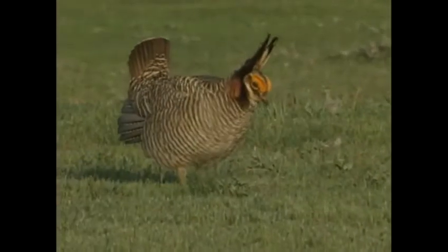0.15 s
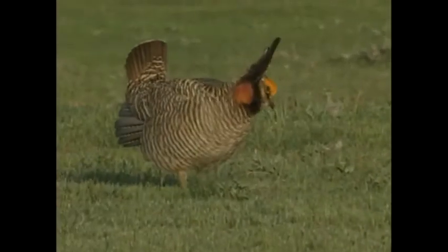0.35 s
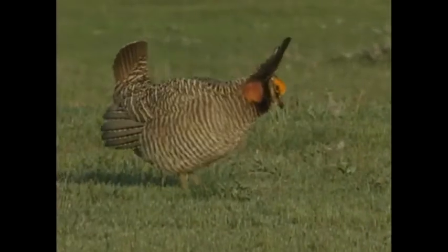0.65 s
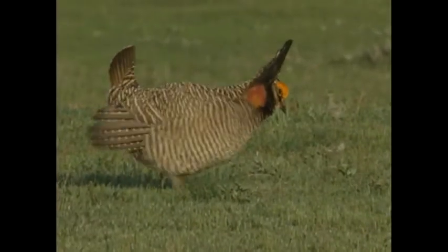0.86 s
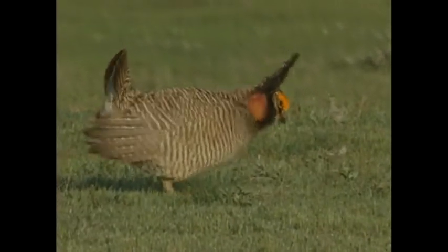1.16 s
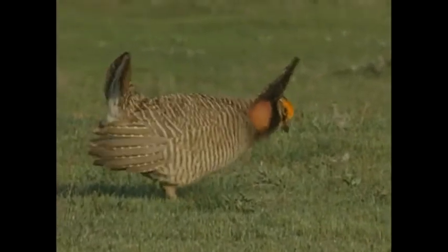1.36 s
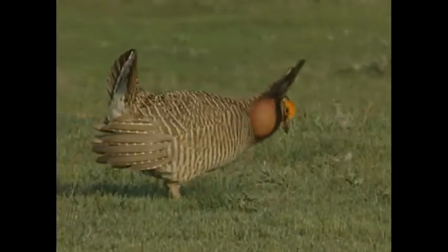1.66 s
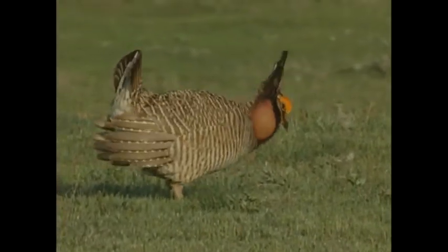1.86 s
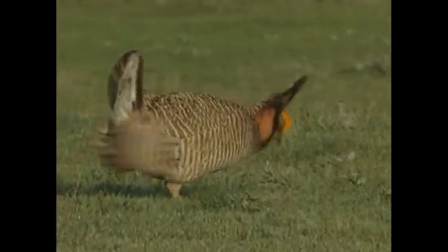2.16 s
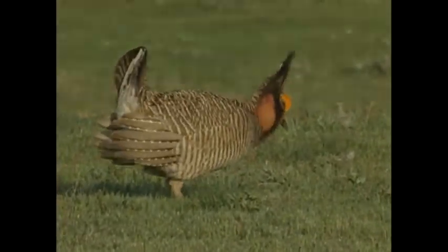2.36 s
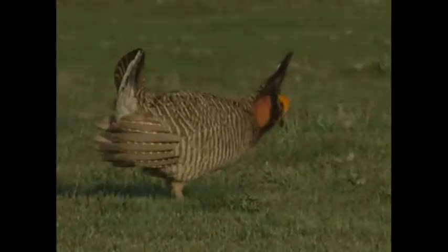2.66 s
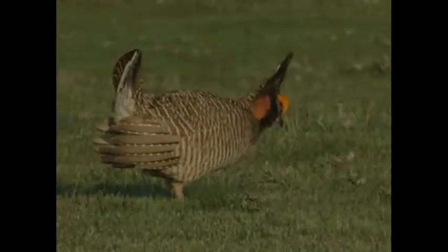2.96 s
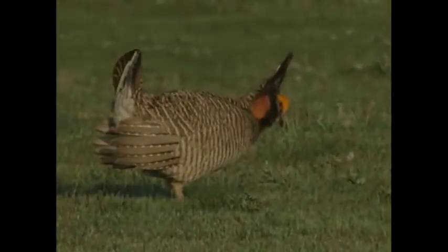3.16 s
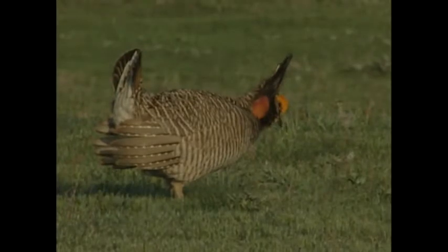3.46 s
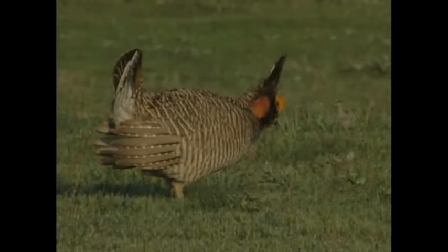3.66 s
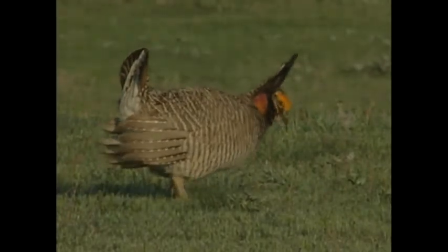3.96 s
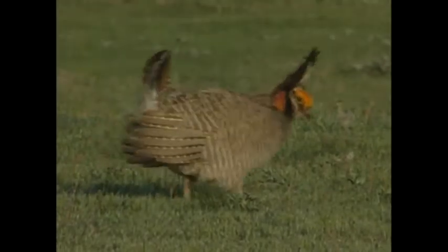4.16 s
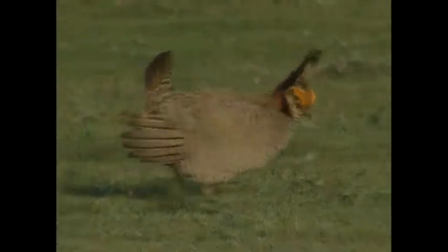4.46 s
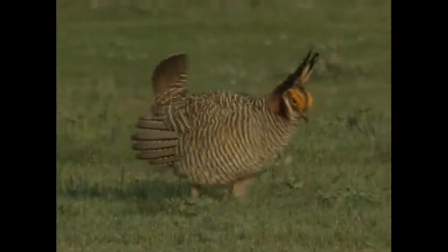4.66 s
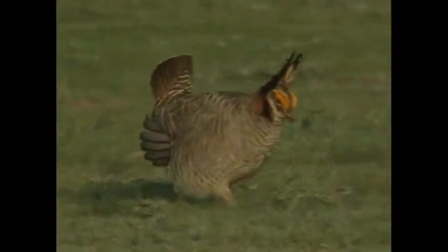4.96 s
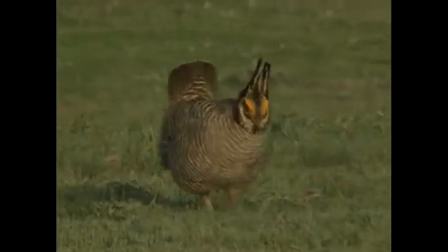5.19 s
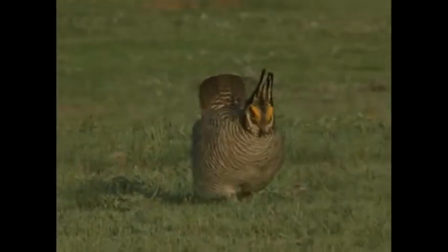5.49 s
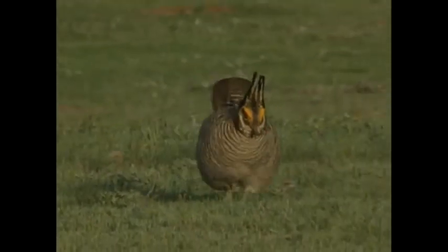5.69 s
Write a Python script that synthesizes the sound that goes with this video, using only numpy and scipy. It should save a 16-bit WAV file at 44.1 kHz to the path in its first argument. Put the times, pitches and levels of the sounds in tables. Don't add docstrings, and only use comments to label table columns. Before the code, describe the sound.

Open grassland, dry with barely any echo, heard almost in mono. Soft grass hiss and low wind rumble run throughout, with a barely audible fast motor tick. A sharp, bright, arched chip from a nearer small bird comes at 0.13 s, again at 0.66, faintly at 1.9, then at 3.3, 4.08 (loudest), 4.74, 5.16 and 5.6. From 0.4 to about 1.85 s male grouse some way off gobble: short hollow, near-pure notes around 400 to 900 Hz, sliding, leaping, held and dropping. A denser, louder overlapping bout bubbles from 2.1 to 2.9 s, closing with popping clucks. From 2.9 to 4.6 s only very faint distant notes and thin songbird whistles remain. The last bout runs 4.64 to 5.4 s, with a faint feather rustle near 5 s and a final cluck. Gusts buffet near 2.2 to 2.6 s, thump hard around 4.45 to 4.8, and rise again at the end.

```python
import sys
import numpy as np
from scipy import signal
from scipy.fft import rfft, irfft
from scipy.io import wavfile
from scipy.ndimage import uniform_filter1d

SR = 44100
rng = np.random.default_rng(int(sys.argv[2]) if len(sys.argv) > 2 else 0)


def level_to_linear(level):
    exponent = np.asarray(level, float) / 20
    return 10 ** exponent


def wav_record(signal):
    frames = np.transpose(np.atleast_2d(signal))
    bounded = np.clip(frames, -1, 1)
    quanta = np.round(bounded * 32767).astype(np.int16)
    wavfile.write(sys.argv[1], SR, quanta)


N = 257103


def level(x, db):
    return x * level_to_linear(db) / np.sqrt(np.mean(x ** 2))


def band(x, lo_hz, hi_hz, order):
    return signal.sosfilt(signal.butter(order, [lo_hz, hi_hz], "band", fs=SR, output="sos"), x)


def walk(rate):
    k = int(SR / rate)
    held = np.repeat(rng.standard_normal(N // k + 1), k)
    return 1.3 * uniform_filter1d(uniform_filter1d(held, k), k)[:N]


def add(out, start_s, sound):
    i = int(start_s * SR)
    out[i:i + len(sound)] += sound[:len(out) - i]


def note(rows, edge_s, glide_s):
    s, hz, db = np.transpose(rows)
    t = np.arange(s[0] - edge_s, s[-1] + edge_s, 1 / SR)
    k = max(int(glide_s * SR), 1)
    pitch, gain = (uniform_filter1d(np.interp(t, s, c), k, mode="nearest") for c in (hz, db))
    fade_in_out = np.clip(np.minimum(t - t[0], t[-1] - t) / (2 * edge_s), 0, 1)
    phase = 2 * np.pi * np.cumsum(pitch) / SR
    return phase, pitch, np.sqrt(2) * level_to_linear(gain) * np.sin(np.pi / 2 * fade_in_out) ** 2


def slur(start, length, from_hz, to_hz, db):
    return [(start, from_hz, db), (start + length, to_hz, db)]


def wind():
    # t/s, level/dB
    gust = [(0, -58.5), (.35, -57), (.7, -62), (1.05, -65.5), (1.4, -62.5), (2.0, -62.5), (2.2, -52.5),
            (2.38, -54), (2.55, -51), (2.75, -60.5), (3.1, -56.5), (3.5, -60), (4.3, -66), (4.518, -60),
            (4.535, -44), (4.74, -44), (4.88, -58), (5.3, -54), (5.83, -56)]
    # t/s, level/dB
    knocks = [(.64, 7), (.9, 10.5), (4.451, 13), (1.005, 4.5), (4.54, 1), (4.585, 2), (4.63, 2.5),
              (4.725, 4), (4.805, 3), (5.38, 3), (5.55, 7), (5.82, 7)]
    knock_s, steady_db = .018, -58.5
    buffet_over_rumble_db = -0.5

    t = np.arange(N) / SR
    knock_db = sum(db * np.exp(-((t - s) / knock_s) ** 2) for s, db in knocks)
    deep_db = np.interp(t, *np.transpose(gust)) + knock_db
    steady_power = level_to_linear(steady_db + knock_db) ** 2
    gust_power = level_to_linear(deep_db + buffet_over_rumble_db) ** 2
    buffet_db = 10 * np.log10(steady_power + gust_power)
    eddies = walk(35) * np.interp(buffet_db, [-56, -44], [1, 3])

    deep = level(band(rng.standard_normal(N), 30, 78.2, order=2), 0.078)
    deep = deep * level_to_linear(deep_db + 1.66 * walk(8.9) + eddies)
    buffet = level(band(rng.standard_normal(N), 72.6, 117.7, order=4), 0.15) * level_to_linear(buffet_db + eddies)
    spill = level(band(rng.standard_normal(N), 122, 193, order=2), 23.6)
    spill = spill * level_to_linear(2.11 * buffet_db + 2 * eddies)
    return deep + buffet + spill


def air():
    # f/Hz, density level/dB
    spectrum = [(110, -29.5), (185, 4.5), (394, -8.5), (453, -12.5), (2160, -25.5), (2530, -24),
                (12300, -26), (16000, -57), (22000, -120)]
    f = np.arange(N // 2 + 1) * SR / N + 1e-3
    hz, db = np.transpose(spectrum)
    colour = level_to_linear(np.interp(np.log(f), np.log(hz), db, left=-60))
    hiss = irfft(rfft(rng.standard_normal(N)) * colour, N)
    return level(band(hiss, 192.6, SR / 2.5, order=4), -66.5)


def ticks():
    period_s, start_s, limp_s = .025, .0155, .001
    k = np.arange(int((N / SR - .1) / period_s))
    times_s = start_s + k * period_s + limp_s * (k % 2)
    clicks = np.zeros(N)
    clicks[(times_s * SR).astype(int)] = level_to_linear(2.5 * rng.standard_normal(len(k)))
    return level(band(clicks, 1000, 1900, order=2), -83.5)


def songbirds():
    # start t/s, length t/s, from f/Hz, to f/Hz, level/dB
    whistles = [ (1.557, 0.033, 5600, 5800, -74.5), (2.127, 0.022, 5080, 4900, -75),
                (2.812, 0.073, 2729, 2635, -75), (2.983, 0.15, 3340, 3250, -77.5),
                (3.253, 0.058, 2060, 2030, -72), (3.364, 0.029, 2120, 2080, -79),
                (3.751, 0.041, 1780, 1747, -68), (4.703, 0.13, 2580, 2450, -78.5),
                (4.92, 0.21, 1720, 1610, -76), (5.316, 0.12, 2160, 2020, -75.5),
                (5.532, 0.052, 3000, 2740, -76), (5.811, .03, 2390, 2250, -75),
                (3.635, 0.074, 2261, 2180, -87), (3.635, 0.02, 1390, 1360, -79),
                (3.1, .03, 1720, 1700, -81), (3.445, .03, 3300, 2595, -79), (3.542, .014, 2570, 2560, -80),
                (0.092, .035, 2350, 2300, -78), (3.74, .012, 1500, 1760, -80), ]
    out = np.zeros(N)
    for row in whistles:
        phase, _, gain = note(slur(*row), edge_s=.016, glide_s=.004)
        add(out, row[0] - .016, gain * np.sin(phase))
    return out * level_to_linear(3 * walk(45))


def chipper():
    # start t/s, length t/s, top f/Hz, level/dB, brightness per partial level/dB
    chips = [
        (0.134, 0.055, 1943, -46, 2.5),
        (0.662, 0.051, 1954, -42, -0.2),
        (1.909, 0.05, 1888, -53, 1.4),
        (3.3079, 0.055, 1872, -44, 0.76),
        (4.075, 0.056, 1913, -39.5, -2.5),
        (4.736, 0.048, 1890, -45, 0.83),
        (5.161, 0.055, 1918, -44.5, 0.85),
        (5.617, 0.052, 1883, -48, 2.5),
    ]
    # f/Hz, level/dB
    throat = [(1650, -43), (1900, -30.5), (3200, -20), (3850, -5), (4800, -18), (5700, -11), (6900, -19.5),
              (7800, -26), (8500, -31.5), (9700, -41.5), (10500, -43), (11300, -35.5)]

    out, drift, grip, rasp = np.zeros(N), walk(150), walk(200), walk(1500)
    catch = level(uniform_filter1d(rasp, size=80), 0)
    for start, length, top_hz, db, bright_db in chips:
        u = np.arange(0, 1, 1 / (length * SR))
        i = int(start * SR) + np.arange(len(u))
        coupling = np.exp(-((u - .44) / .28) ** 4) + .6 * u ** 8
        coupling = coupling * level_to_linear(5 * np.tanh(grip[i]))

        climb = .17 * np.clip(1 - u / .42, 0, 1) ** 2.6
        fall = .17 * np.clip((u - .45) / .55, 0, 1) ** 3.8
        arch = 1 - climb - fall
        phase = 2 * np.pi * np.cumsum(top_hz * arch * (1 + .011 * coupling * drift[i])) / SR
        beat = 2 * np.pi * np.cumsum(365 * (1 + .14 * drift[i])) / SR
        sidebands = 1 + coupling * (level_to_linear(-11.5) * np.exp(1j * beat) + level_to_linear(-35.0) * np.exp(2j * beat))

        envelope = (0.3 + np.clip(u / 0.22, 0, 1) ** 1.26) * np.clip(u * 160, 0, 1)
        envelope = envelope * (1.25 - 0.38 * u) * np.clip((1 - u) / 0.15, 0, 1)
        envelope = envelope * (1 - np.clip(.4 * coupling * (catch[i] - .4), 0, .9))
        dull_db = -7 * u

        tone = 0
        for k in range(1, 7):
            partial_db = np.interp(k * top_hz * arch, *np.transpose(throat)) + k * bright_db + dull_db * (k > 4)
            rough_phase = k * (phase + .045 * k * coupling * rasp[i])
            tone = tone + level_to_linear(partial_db) * np.exp(1j * rough_phase)
        add(out, start, np.sqrt(2) * level_to_linear(db) * envelope * (sidebands * tone).imag)
    return out


def swell(start, length, from_hz, to_hz, db, shape=(18, 0.664, 8)):
    rise_db, share, sink_db = shape
    u = np.array([0, share, 1])
    return np.c_[start + u * length, from_hz + u * (to_hz - from_hz), db - np.array([rise_db, 0, sink_db])]


def sung(start, t, hz, db):
    # pitch f/Hz, level/dB
    sac = [(330, -16), (450, -10), (600, -1.5), (710, -3), (790, -8.5), (860, -10.5), (990, -16.5)]
    return np.c_[start + t, hz, db + np.interp(hz, *np.transpose(sac))]


def bubble(start, length, crown_hz, end_hz, db, share=0.39):
    foot_hz, roundness = 520, 2.17
    u = np.linspace(0, 1, num=40)
    up = np.clip(1 - u / share, 0, 1) ** roundness
    down = np.clip((u - share) / (1 - share), 0, 1) ** roundness
    hz = crown_hz - up * (crown_hz - foot_hz) - down * (crown_hz - end_hz)
    return sung(start, u * length, hz, db)


def leap(*row):
    return bubble(*row, share=.2)


def fade(*row):
    return swell(*row, shape=(6, 0.12, 11.5))


def drop(at, from_hz, db):
    # t/s from the knee, pitch ratio, level/dB
    plunge = [
        (-.008, 1.11, -6),
        (0, 1.017, 1),
        (.005, .78, -10),
        (.013, 0.41, -21.5),
    ]
    return np.array(plunge) * [1, from_hz, 1] + [at, 0, db]


def hold(start, length, crown_hz, knee_hz, db):
    effort = [-9, 2.5, -2.5]
    t = np.linspace(0, length, num=40)
    corners_s = [0, .022, length]
    hz = np.interp(t, corners_s, [400, crown_hz, knee_hz])
    return sung(start, t, hz, db + np.interp(t, corners_s, effort))


def cluck(at, lead_hz, db, fork_db):
    # t/s from the pop, f/Hz, level/dB
    tail = [
        (0, 735, 0.5),
        (.005, 556, -7.5),
        (0.01, 419, -15.5),
        (0.019, 370, -20),
        (.036, 323, -27.5),
    ]
    # t/s from the pop, f/Hz, level/dB
    fork = [
        (.009, 830, -4),
        (0.024, 730, 1),
        (.037, 720, -12),
    ]
    lead_in = (-0.013, lead_hz, -13.5)
    return [np.array([lead_in] + tail) + [at, 0, db], np.array(fork) + [at, 0, db + fork_db]]


def lift(at, db):
    # t/s from the peak, f/Hz, level/dB
    upstroke = [
        (-.013, 410, -23.5),
        (0, 623, 0),
        (.006, 720, -8.5),
    ]
    return np.array(upstroke) + [at, 0, db]


def scoop(start, length, trough_hz, db):
    # share of length, pitch ratio, level/dB
    contour = [
        (0, 1.08, -13),
        (.33, 1.06, -6.5),
        (.6, 1, -14),
        (.8, 1.022, 0),
        (.92, 1.3, -1),
        (1, 1.45, -19),
    ]
    return np.array(contour) * [length, trough_hz, 1] + [start, 0, db]


def gobbles():
    # start t/s, length t/s, from f/Hz, to f/Hz, peak level/dB
    swells = [(.405, 0.0319, 637, 529, -39), (.508, 0.0253, 734, 465, -36.5), (.533, 0.05, 396.6, 594, -35),
              (0.821, 0.0436, 596, 712, -40.5), (1.151, 0.061, 480, 534, -36),
              (1.256, .052, 400, 560, -37.5), (1.33, 0.0224, 495, 565, -42.5),
              (1.652, 0.025, 450, 558, -48), (1.672, 0.01, 548, 755, -41.5), (1.678, 0.0315, 745, 743, -36),
              (2.099, 0.0284, 685, 521, -38.5), (2.15, 0.0307, 430, 520, -38.5),
              (2.138, .012, 480, 420, -51), (4.752, 0.019, 400, 560, -44), (2.586, 0.021, 570, 520, -39.5),
              (5.018, .017, 570, 742, -36.5), (2.232, .022, 400, 438, -39), (2.229, 0.043, 879, 448, -29.5),
              (2.27, 0.0255, 452.5, 601, -32.5), (2.404, 0.031, 495, 685, -32),
              (2.429, .016, 670, 777, -34), (2.456, 0.013, 680, 820, -38), (2.624, 0.0102, 752, 830, -41.5),
              (4.638, 0.024, 556, 503, -39), (4.94, 0.0268, 495, 689, -33), (4.964, 0.027, 759, 690, -30),
              (4.996, 0.028, 550, 510, -41), (5.179, .015, 670, 780, -33), (5.034, 0.014, 690, 875, -41.5),
              (.884, .042, 478, 570, -51)]
    # start t/s, length t/s, crown f/Hz, end f/Hz, level/dB
    leaps = [
        (0.433, 0.022, 727, 710, -40),
        (2.121, 0.053, 841, 703, -39),
        (2.296, 0.0323, 974, 744, -29.5),
        (4.657, 0.046, 845, 650, -40.5),
    ]
    # start t/s, length t/s, from f/Hz, to f/Hz, level/dB
    slurs = [ (.474, 0.019, 420, 394, -56.5), (.46, 0.052, 821, 760, -58), (1.06, 0.045, 579, 515, -67),
             (0.57, 0.038, 635, 685, -37.5), (0.616, 0.084, 780, 769.5, -47.5),
             (1.762, 0.044, 610, 540, -53), (1.882, 0.062, 440, 656, -66), (2.017, 0.038, 487, 650, -64.5),
             (2.065, 0.026, 796, 790, -66), (2.955, 0.011, 750, 726, -65), (3.093, 0.017, 410, 480, -66),
             (3.177, 0.043, 548, 428, -64), (3.204, 0.054, 417, 494, -58.5),
             (3.267, 0.031, 400, 610, -60.5), (3.314, 0.037, 410, 684, -64), (3.338, 0.039, 764, 700, -70),
             (3.395, 0.02, 470, 740, -62.5), (3.463, 0.066, 570, 440, -67), (3.67, 0.06, 580, 468, -70.5),
             (3.756, 0.034, 420, 407, -67), (3.771, 0.032, 800, 764, -69), (3.855, 0.11, 607, 600, -78.5),
             (4.675, 0.031, 440, 420, -56), (2.5, 0.088, 740, 630, -53.5), (2.716, 0.016, 740, 510, -62),
             (5.26, .014, 720, 560, -60), (5.108, .014, 760, 560, -61), (2.655, 0.018, 1220, 980, -66.5),
             (2.84, 0.016, 1210, 1000, -68), (5.205, .025, 1230, 950, -68), (1.84, .022, 1160, 930, -72),
             (1.123, 0.0063, 480, 730, -60.5), (2.985, 0.011, 740, 740, -69), (3.17, 0.011, 740, 630, -69),
             (3.31, 0.011, 620, 560, -64), (3.61, .035, 403, 450, -69.5), (3.688, 0.011, 650, 570, -69),
             (3.745, 0.017, 810, 710, -65.5), (2.9, 0.011, 760, 800, -69), (4.728, 0.012, 450, 400, -51), ]
    # start t/s, length t/s, from f/Hz, to f/Hz, peak level/dB
    fades = [(0.712, 0.018, 700, 740, -46.5), (0.858, 0.0294, 690, 475, -44),
             (1.213, 0.029, 524, 740, -45.5), (1.249, 0.019, 540, 714, -39), (1.314, 0.019, 620, 780, -49),
             (1.352, 0.035, 530, 580, -44.5), (1.398, 0.015, 620, 760, -50), (1.709, 0.049, 620, 540, -48),
             (1.522, .01, 700, 860, -52), (1.824, .034, 660, 340, -53), (1.94, .055, 850, 830, -64),
             (2.176, 0.019, 554, 980, -34), (2.193, 0.031, 810, 660, -47), (2.306, 0.018, 680, 540, -36.5),
             (2.324, .012, 757, 510, -41), (4.791, 0.021, 560, 670, -39.5), (2.384, .018, 700, 590, -40),
             (4.75, 0.0117, 645, 540, -37.5), (1.7, .022, 900, 640, -51), (.733, .014, 720, 1100, -53.5),
             (1.2, 0.011, 640, 720, -49), (1.4, 0.0085, 602, 570, -40), (.585, 0.029, 590, 600, -48.5),
             (4.845, 0.024, 620, 710, -37.5), (2.483, 0.036, 710, 670, -45), (5.066, 0.017, 770, 770, -47),
             (2.225, 0.014, 600, 500, -41), (2.224, .012, 700, 870, -40), (2.333, 0.022, 900, 880, -42),
             (4.707, 0.012, 570, 590, -39), (4.987, 0.016, 590, 527, -41.5),
             (2.289, 0.011, 563, 550, -34.5)]
    # t/s, from f/Hz, level/dB
    drops = [
        (.709, 690, -35.5),
        (.816, 495, -57),
        (1.394, 700, -47),
        (1.517, 699, -45),
        (1.62, 758, -46),
        (1.312, 490, -45),
    ]
    # start t/s, length t/s, crown f/Hz, knee f/Hz, level/dB
    holds = [
        (0.732, 0.076, 629, 520, -40),
        (1.335, 0.05, 860, 835, -44.5),
        (1.416, .098, 846, 758, -40),
        (1.538, 0.081, 807.4, 837, -38.5),
    ]
    # t/s, lead-in f/Hz, level/dB, fork level/dB
    clucks = [
        (0.942, 594, -42.5, -7),
        (1.822, 577, -50, -18),
        (2.475, 774, -35, -21),
        (2.646, 835, -35, -13.5),
        (2.853, 603, -37, -9),
        (5.058, 850, -35, -21),
        (5.196, 721, -33.5, -7.5),
        (5.397, 613, -39, -9),
    ]
    # t/s, level/dB
    lifts = [
        (1.35, -40),
        (2.177, -43),
        (2.343, -33.5),
        (4.772, -36.5),
        (4.822, -34.5),
        (4.885, -39),
    ]
    # start t/s, length t/s, crown f/Hz, end f/Hz, level/dB
    bubbles = [
        (2.348, 0.036, 901, 740, -35),
        (4.717, 0.034, 809, 660, -44.5),
        (4.771, 0.029, 761, 600, -44),
        (4.818, 0.032, 777, 640, -40.5),
        (4.88, 0.056, 830, 596, -36.5),
        (5.128, 0.034, 610, 490, -52),
    ]
    # start t/s, length t/s, trough f/Hz, level/dB
    scoops = [
        (2.528, 0.096, 533, -40.5),
        (2.732, 0.097, 516, -44.5),
        (5.273, 0.098, 511, -47),
    ]

    kinds = [(lift, lifts), (hold, holds), (drop, drops), (bubble, bubbles), (leap, leaps),
             (swell, swells), (fade, fades), (scoop, scoops), (slur, slurs)]
    notes = [shape(*row) for shape, table in kinds for row in table]
    return notes + [part for row in clucks for part in cluck(*row)]


def grouse():
    # from t/s, to t/s
    beak_open = [(.41, .44), (.52, .58), (.73, .83), (.875, .91), (1.25, 1.3), (1.41, 1.43), (1.53, 1.56),
                 (1.65, 1.69), (2.1, 2.13), (2.535, 2.575), (2.59, 2.61), (2.725, 2.785), (2.8, 2.82),
                 (4.64, 4.67), (4.75, 4.83), (5.13, 5.16), (5.28, 5.33), (5.345, 5.36)]
    # pitch f/Hz, level/dB
    overtone = [
        (400, -12),
        (590, -17),
        (660, -38),
    ]
    pure, upper, beak = np.zeros(N), np.zeros(N), np.full(N, level_to_linear(-16))
    for start, end in beak_open:
        beak[int(start * SR):int(end * SR)] = 1
    for rows in gobbles():
        phase, pitch, gain = note(rows, edge_s=0.0034, glide_s=0.0011)
        start = rows[0][0] - .003
        add(pure, start, gain * np.sin(phase))
        upper_gain = np.minimum(gain, level_to_linear(-51.0)) * level_to_linear(np.interp(pitch, *np.transpose(overtone)))
        add(upper, start, upper_gain * np.sin(2 * phase))
    voices = pure + upper * uniform_filter1d(beak, size=300)
    return voices * level_to_linear(2 * np.tanh(walk(140)))


def rustle():
    puff = np.exp(-((np.arange(N) / SR - 4.98) / 0.066) ** 2)
    return level(band(rng.standard_normal(N), 1200, 4200, order=2), -74.5) * puff


def field(x, t60_s, db):
    t = np.arange(int(.25 * SR)) / SR
    tail = rng.standard_normal(len(t)) * 10 ** (-3 * t / t60_s) * (t > .004)
    return x + level_to_linear(db) * signal.fftconvolve(x, tail / np.sqrt(np.sum(tail ** 2)))[:N]


def mismatch(x, lo_hz, hi_hz, db):
    loud = np.sqrt(uniform_filter1d(x ** 2, size=1500) + 1e-14)
    return level(band(rng.standard_normal(N), lo_hz, hi_hz, order=3), db) * loud ** 0.69


def scene():
    calls = field(grouse(), t60_s=.1, db=-24)
    chips = field(chipper(), t60_s=.06, db=-28)
    hiss = air()
    whine = level_to_linear(-88.4) * np.sin(np.pi / 2 * np.arange(N))
    mid = calls + chips + songbirds() + wind() + hiss + whine + rustle() + ticks()
    side = mismatch(calls, 450, 1270, -56.5) + mismatch(chips, 3660, 6700, -43.5)
    side = side + mismatch(hiss, 2600, 12000, -48.0) + mismatch(hiss, 10600, 12400, -48)
    side = side + mismatch(mid, 45, 160, -65) + mismatch(hiss, 900, 1900, -53)
    return np.array([mid + side, mid - side])


def low_pass(x):
    return signal.sosfilt(signal.butter(12, 12440, fs=SR, output="sos"), x)


def record(dry):
    top = signal.ellip(10, .2, 60, 12450, fs=SR, output="sos")
    return low_pass(signal.sosfilt(top, dry))


dry = scene()
out = record(dry)
wav_record(out)
```